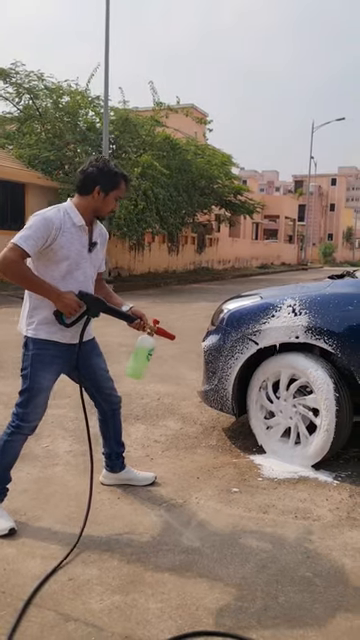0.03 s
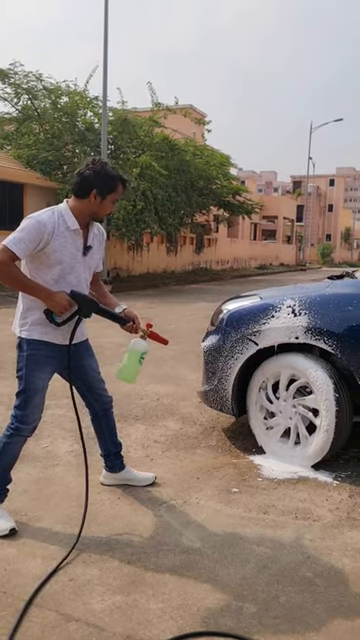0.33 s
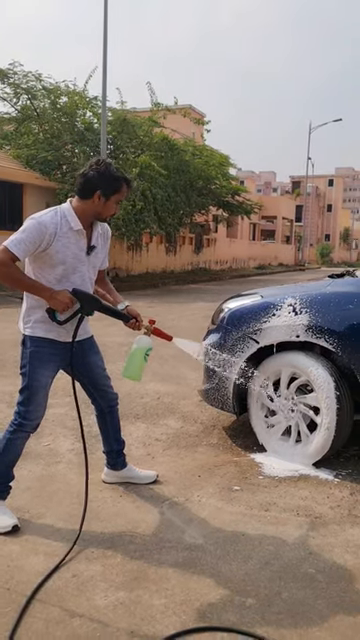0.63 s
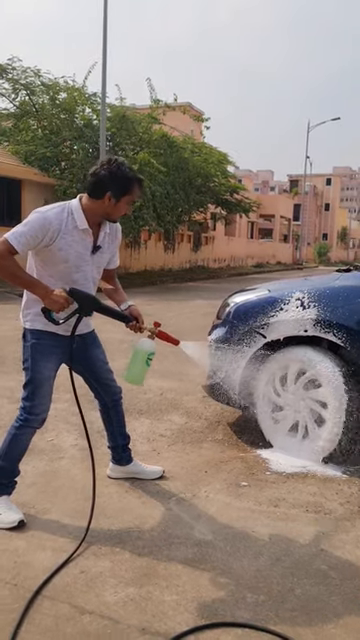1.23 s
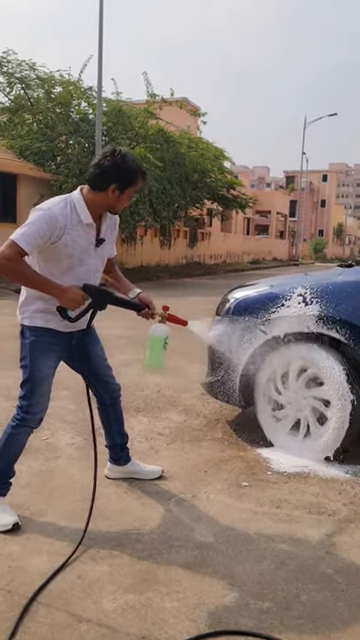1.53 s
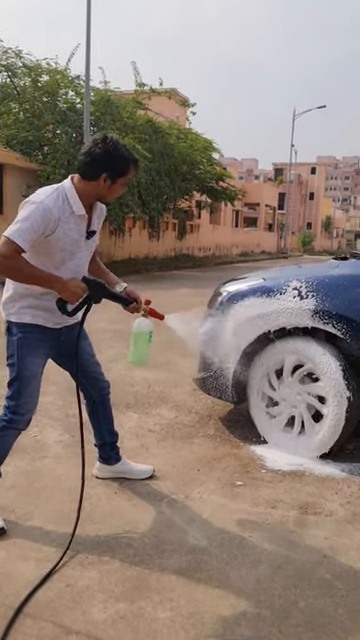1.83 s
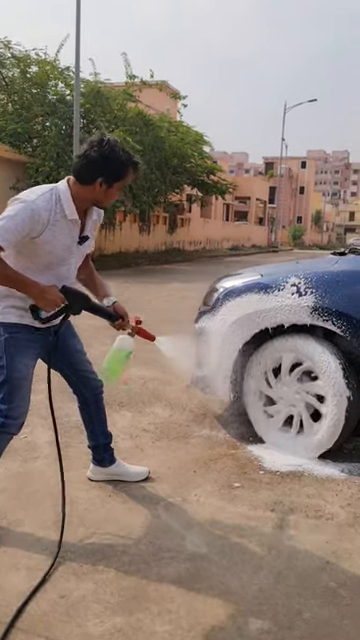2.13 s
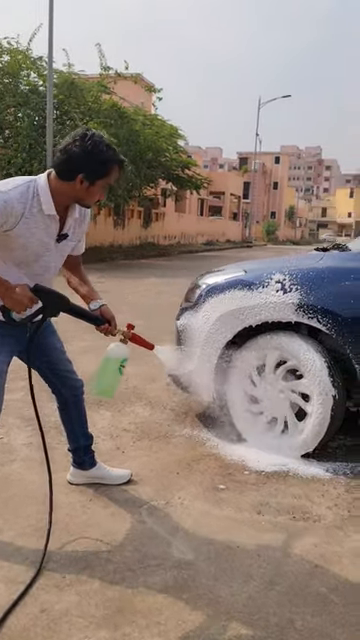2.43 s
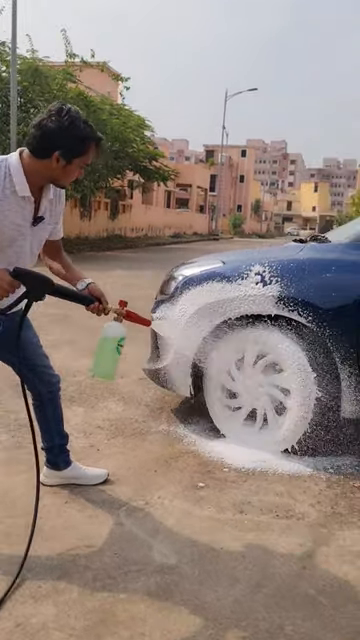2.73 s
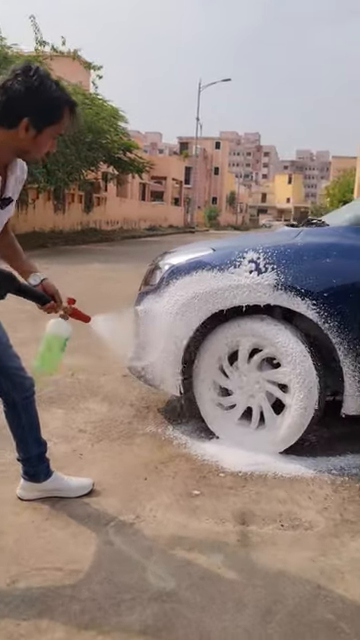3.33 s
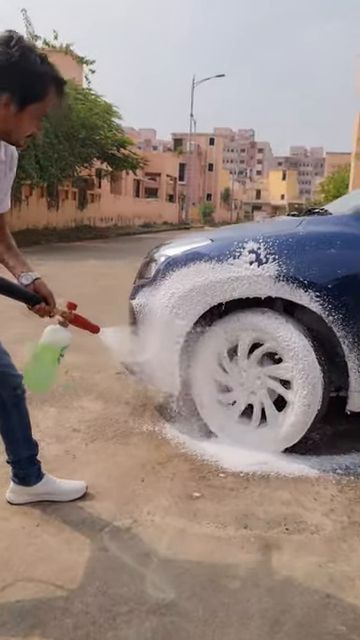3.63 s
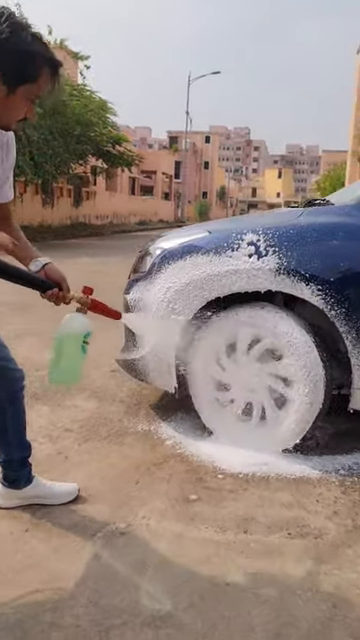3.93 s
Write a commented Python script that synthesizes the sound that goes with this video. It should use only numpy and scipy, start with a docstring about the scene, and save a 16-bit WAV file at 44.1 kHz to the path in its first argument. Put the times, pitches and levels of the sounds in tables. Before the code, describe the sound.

On a quiet street, a pressure washer kicks in after a few faint clicks. The spray gun clacks, the motor whines up to speed, and the pump hums on beneath hissing foam that patters against a car.

```python
"""An electric pressure washer foams the wing of a car in a quiet street.
First come faint clicks and a soft rumble. Just after half a second the trigger clacks, the foam
nozzle starts to hiss and the motor jolts and squeals up to speed. A valve whistles as pressure builds.
From then on a three-piston pump drones, rattles and whines through its gears,
and the hiss turns brighter whenever the fan of droplets strikes the bodywork."""
import sys
import numpy as np
from scipy import signal
from scipy.fft import rfft, irfft
from scipy.io import wavfile

SR = 44100
rng = np.random.default_rng(int(sys.argv[2]) if len(sys.argv) > 2 else 0)


def store_pcm(level_fs):
    """Save levels as 16-bit WAV."""
    pcm = np.round(np.clip(level_fs, -1, 1) * 32767).astype(np.int16)
    wavfile.write(sys.argv[1], SR, np.atleast_2d(pcm).T)


N = 176400
T = np.arange(N) / SR
FREQS = np.arange(N // 2 + 1) * SR / N + 1e-3


# The shaft's running speed, sagging under load. Each row: time in seconds, turns per second.
SHAFT_SPEED = [(1, 94.3), (1.3, 95), (1.55, 94.45), (1.7, 93.9), (1.85, 93.78), (2.15, 94.1), (2.45, 94.36),
               (2.8, 94.45), (4, 94.44)]
PISTONS = 3
def pump():
    """One turning shaft drives the pistons and gears, so all their sounds rise together."""
    speed = curve(SHAFT_SPEED) * spin_up()
    turn = 2 * np.pi * np.cumsum(speed * (1 + 0.000777 * wander(9.6))) / SR  # shaft angle
    pace = speed / speed.max()
    return piston_drone(turn, speed) + whine(turn, pace) + rattle(turn, pace) + main_gear(turn, pace)


def spin_up(start_s=.565, lag_s=.16):
    """The motor gathers speed after the trigger is pulled: 0 is still, 1 is full speed."""
    return 1 - np.exp(-np.maximum(T - start_s, 0) / lag_s)


# Levels in dB of the tones at 1, 2, 3.. times the stroke rate.
HARMONIC_DB = [-29, -30, -29, -34, -37]
# The casing rings more at some pitches. Each row: pitch in Hz, boost in dB.
CASING_BOOST = [(150, -5.5), (200, 1), (283, 0), (380, -3), (440, 2), (520, 3.5), (565, -1), (610, -5.5),
                (700, -1.5), (790, 5), (850, 1.5), (950, 0.5), (1020, -8), (1090, -11.5), (1130, -6.5),
                (1400, -13.5)]
# How the drone swells. Each row: time in seconds, boost in dB.
DRONE_BOOST = [(.6, -67), (.7, -16.5), (.74, -13.5), (.77, -2.5), (.83, 1), (.95, -0.5), (1.04, 3),
               (1.2, 0.5), (1.45, -1), (2.1, 0.5), (2.7, 0.5), (3.3, -1), (4, 1)]
def piston_drone(turn, speed):
    """Each piston stroke is a dip in pressure; the fast dips blend into a drone."""
    drone = 0
    for k, db in enumerate(HARMONIC_DB, 1):
        casing_db = np.interp(k * PISTONS * speed, *np.array(CASING_BOOST).T)
        lag = .8 * ((k - 2) ** 2 - 1)  # the casing delays higher tones and rounds each stroke
        drone -= tone(k * PISTONS * turn - lag, db + casing_db, flutter_db=.5, jitter=.1)
    return drone * amp(curve(DRONE_BOOST))


# Tones of the pistons, then the gears: pitches as multiples of shaft speed, full-speed levels in dB.
PISTON_MULTIPLES = [1, 2, 5, 7, 8, 10, 11, 13, 17, 18]
PISTON_DB = [-57, -47.5, -42.5, -48, -38.5, -47, -46.5, -61, -47, -59]
TOOTH_MULTIPLES = [22, 24, 26, 27, 29, 30, 33, 36, 39]
TOOTH_DB = [-49.5, -52.5, -58, -43.5, -50, -50, -45.5, -65, -46]
def whine(turn, pace, gear_ratio=4.547):
    """The motor, unequal pistons and gear teeth add tones that come in only near full speed."""
    tones = tone(gear_ratio * turn, db=-38.5, flutter_db=.7, jitter=.52)  # the motor
    for k, db in zip(PISTON_MULTIPLES, PISTON_DB):
        tones += tone(k * turn + 2 * np.pi * rng.random(), db, flutter_db=1.6, jitter=.14)
    for k, db in zip(TOOTH_MULTIPLES, TOOTH_DB):
        tones += tone(k * turn + 2 * np.pi * rng.random(), db, flutter_db=2, jitter=.24)
    return tones * pace ** 4.3


# The housing's rattle. Each row: pitch in Hz, level in dB per Hz.
RATTLE_COLOUR = [(30, -100), (60, -90.5), (150, -75.5), (210, -71), (300, -64.5), (450, -61), (650, -64.5),
                 (850, -60), (1070, -68), (1250, -61), (1450, -71.5), (2500, -71), (6000, -112)]
def rattle(turn, pace):
    """The pump housing shakes with every stroke, every turn and every half turn."""
    shake = np.exp(.23 * np.cos(PISTONS * turn) + .36 * np.cos(turn) + .085 * np.cos(2 * turn))
    shake /= np.sqrt(np.mean(shake ** 2))  # keep the average power
    return colour(noise() * shake * pace ** .67, RATTLE_COLOUR)


# The main gear's whine. Each row: time in seconds, level in dB.
MAIN_GEAR_LEVEL = [(.68, -75), (.725, -43), (.85, -39), (.95, -41), (1.2, -50), (1.55, -38.5), (2.1, -39),
                   (2.45, -46), (3.0, -41.5), (3.5, -42.5), (4, -44)]
def main_gear(turn, pace, teeth=50):
    """Meeting teeth sing one high note, raspy while the motor speeds up."""
    rasp = 3.6 * (1 - pace) * wander(90)
    return tone(teeth * turn + rasp, curve(MAIN_GEAR_LEVEL), flutter_db=1.5, jitter=.3)


def squeal(start_s=.635, length_s=.1, from_hz=3700, to_hz=5460, width_hz=330):
    """A rough squeal glides up and fades as the motor gets under way."""
    progress = np.clip((T - start_s) / length_s, 0, 1)
    angle = 2 * np.pi * np.cumsum(from_hz + (to_hz - from_hz) * progress) / SR
    rough = wander(width_hz) * np.cos(angle) + wander(width_hz) * np.sin(angle)
    return rough * amp(-39.5) * np.sin(np.pi * progress)


# The nozzle's hiss. Each row: pitch in Hz, level in dB per Hz.
JET_COLOUR = [(30, -120), (500, -86), (1700, -76), (2200, -71), (2800, -67.5), (3400, -63), (4100, -68),
              (5200, -67), (6500, -71), (8000, -80), (10000, -80), (12500, -96.5), (15500, -97)]
# The jet's strength. Each row: time in seconds, boost in dB.
JET_BOOST = [(.552, -80), (.562, -18), (.63, -16.5), (.69, -10), (.74, -7), (.81, -1.5), (.97, -2),
             (1.2, 0), (1.5, 0), (2.1, -0.5), (2.8, 1), (3.4, 2), (3.7, 0.5), (4, 0.5)]
def jet(dull_hz=5760):
    """The nozzle hisses, duller until the pump is up to speed."""
    hiss = colour(drops() * amp(curve(JET_BOOST) + .65 * wander(60)), JET_COLOUR)
    dull = irfft(rfft(hiss) / (1 + (FREQS / dull_hz) ** 6), N)
    return dull + (hiss - dull) * spin_up() ** 2


# Droplets striking the car. Each row: pitch in Hz, level in dB per Hz.
SPLASH_COLOUR = [(1500, -99.5), (3300, -72.5), (4500, -74), (5400, -73.5), (6700, -68.5), (8200, -74.5),
                 (10000, -75.5), (12500, -81), (15500, -88.5)]
# How hard they hit. Each row: time in seconds, boost in dB.
IMPACT_BOOST = [(.6, -70), (.75, -22), (.85, -9), (.97, -5), (1.15, -12), (1.4, -5), (1.66, 4), (1.77, 2),
                (1.95, 3.5), (2.15, 6), (2.28, -5.5), (2.6, -5.5), (2.83, -9.5), (2.98, -4.5), (3.13, -1),
                (3.42, 4.5), (3.55, 1), (3.65, -9), (4, -2.5)]
def splash(spit_decay_s=.0007):
    """Droplets patter densely on the bodywork, mixed with short spits from the nozzle."""
    impact_db = curve(IMPACT_BOOST)
    kicks = np.abs(drops(per_s=120, spread_db=1.5))
    bursts = signal.lfilter([1], [1, -np.exp(-1 / (spit_decay_s * SR))], kicks)
    spits = unit(bursts * noise()) * amp(-6 + curve(JET_BOOST) + .5 * impact_db)
    patter = drops() * amp(impact_db + .45 * wander(60))
    return colour(patter + spits, SPLASH_COLOUR)


# Each row: middle in seconds, half length in seconds, pitch in Hz, level in dB.
EDGE_SWISHES = [(.9, .11, 7900, -43.5), (1.62, .11, 10400, -44.5), (1.995, 0.12, 7800, -32.5),
                (2.947, 0.18, 2230, -39), (2.98, .06, 8500, -38), (3.3, .09, 6300, -39),
                (3.43, .09, 11700, -47)]
def swishes():
    """The spray rings briefly as it crosses edges and hollows of the wing."""
    return sum(band(hz, width_hz=1700) * amp(db) * swell(at, half) for at, half, hz, db in EDGE_SWISHES)


# The valve's whistle. Each row: time in seconds, level in dB.
WHISTLE_LEVEL = [(.59, -100), (.615, -60), (.66, -47), (.71, -52), (.755, -39), (.8, -46), (.86, -80)]
def valve_whistle():
    """A valve whistles while the pressure builds."""
    return band(6530, width_hz=230) * amp(curve(WHISTLE_LEVEL))


# Each row is a clack: start in seconds, level in dB, decay in seconds, brightness in dB per octave.
GUN_CLACKS = [(0.101, -41.5, 0.0027, -4.5), (.143, -60, .002, 11), (.204, -55, 0.0025, 4),
              (0.432, -58, .003, 7.5), (.47, -62, .003, 4), (.509, -63, .004, 6), (.555, -20, 0.0037, -1),
              (0.585, -23, 0.0039, -3), (.598, -24.5, 0.0066, 0), (.62, -26.5, 0.0088, -2.5),
              (.692, -31, 0.0033, 5.5)]
# The ring of the gun's body. Each row: pitch in Hz, relative level in dB.
GUN_COLOUR = [(30, -67), (100, -25), (300, -3.5), (600, 1.5), (900, 2.5), (1600, -7.5), (2200, -6.5),
              (3500, -13), (5000, -15.5), (9000, -28), (15000, -47)]
def trigger():
    """The spray gun and its valves clack, each blow ringing briefly in the gun's body."""
    clacks = 0
    for start, db, decay, brightness in GUN_CLACKS:
        tilted = [(hz, level + brightness * np.log2(hz)) for hz, level in GUN_COLOUR]
        clacks += unit(colour(noise(), tilted)) * amp(db) * strike(start, decay)
    return clacks


def motor_jolt():
    """The motor jerks with a low thud as it takes current."""
    return band(192, width_hz=96) * amp(-32) * strike(start_s=.607, decay_s=.03)


# Distant traffic. Each row: pitch in Hz, level in dB per Hz.
STREET_COLOUR = [(25, -102), (70, -87.5), (130, -93.5), (250, -97.5), (500, -98), (1000, -102),
                 (2300, -114), (3100, -112), (4000, -117), (7000, -119), (15000, -128)]
def street():
    """Faint far traffic, and one soft low rumble before the washer starts."""
    rumble = band(95, width_hz=74) * amp(-60) * swell(middle_s=.15, half_length_s=.055)
    return colour(noise(), STREET_COLOUR) * amp(1.6 * wander(6)) + rumble


def amp(db):
    """Turn decibels into a volume factor."""
    return 10 ** (np.asarray(db) / 20)


def curve(rows):
    """Join points in time with straight lines."""
    return np.interp(T, *np.array(rows).T)


def unit(x):
    """Scale a signal to a typical size of 1."""
    return x / np.std(x)


def noise():
    """An even hiss (white noise)."""
    return rng.standard_normal(N)


def colour(x, rows):
    """Filter an even hiss to the levels in rows, ringing only after each sound, never before."""
    hz, db = np.array(rows).T
    gain = amp(np.interp(np.log(FREQS), np.log(hz), db))
    cepstrum = irfft(np.log(gain), N)
    forward_only = 1 + np.sign(np.fft.fftfreq(N))
    ring = irfft(np.exp(rfft(cepstrum * forward_only)), N)[:SR // 10]
    return signal.fftconvolve(x, ring)[:N] * np.sqrt(SR / 2)


def band(hz, width_hz):
    """Noise that rings around one pitch."""
    detuning = (FREQS ** 2 - hz ** 2) / (FREQS * width_hz)
    return unit(irfft(rfft(noise()) / (1 + 1j * detuning) ** 2, N))


def wander(rate_hz):
    """A smooth random drift of typical size 1."""
    return unit(irfft(rfft(noise()) / (1 + (FREQS / rate_hz) ** 2), N))


def tone(angle, db, flutter_db, jitter):
    """A machine tone that wavers in level (flutter_db) and timing (jitter, in radians)."""
    return np.sqrt(2) * amp(db + flutter_db * wander(12)) * np.cos(angle + jitter * wander(6.8))


def drops(per_s=5000, spread_db=-.5):
    """Tiny random impacts of unequal size."""
    size = amp(spread_db * np.minimum(rng.exponential(size=N), 5))
    hits = rng.random(N) < per_s / SR
    return unit(hits * size * np.sign(noise()))


def strike(start_s, decay_s):
    """The loudness of a blow: it rises quickly, then dies away."""
    age = np.maximum(T - start_s, 0)
    rise = 1 - np.exp(-age / .0004)
    return rise * np.exp(-age / decay_s)


def swell(middle_s, half_length_s):
    """A smooth rise and fall."""
    return np.exp(-((T - middle_s) / half_length_s) ** 2 / 2)


def scene():
    """Washer, spray and street add up in one channel."""
    washer = pump() + squeal()
    spray = jet() + splash() + valve_whistle() + swishes()
    return (washer + spray + motor_jolt() + trigger() + street())[None]


def record(dry, low_hz=50, top_hz=15500):
    """Thin the deepest bass and cut the highest treble."""
    thin = signal.sosfilt(signal.butter(2, low_hz, "high", fs=SR, output="sos"), dry)
    return signal.sosfilt(signal.ellip(10, .1, 80, top_hz, fs=SR, output="sos"), thin)


dry = scene()
out = record(dry)
store_pcm(out)
```